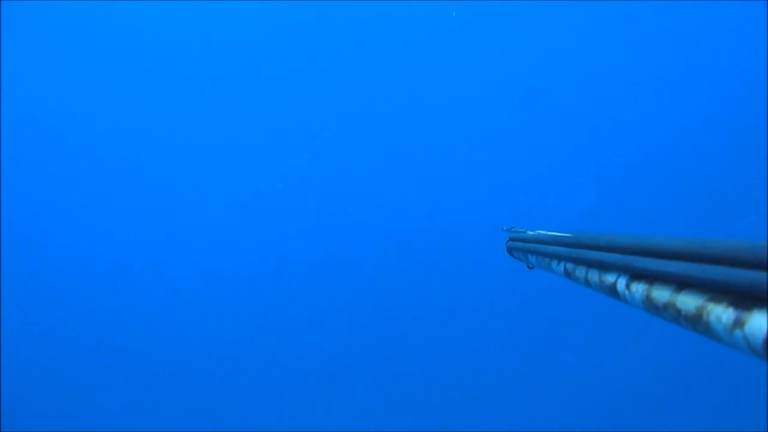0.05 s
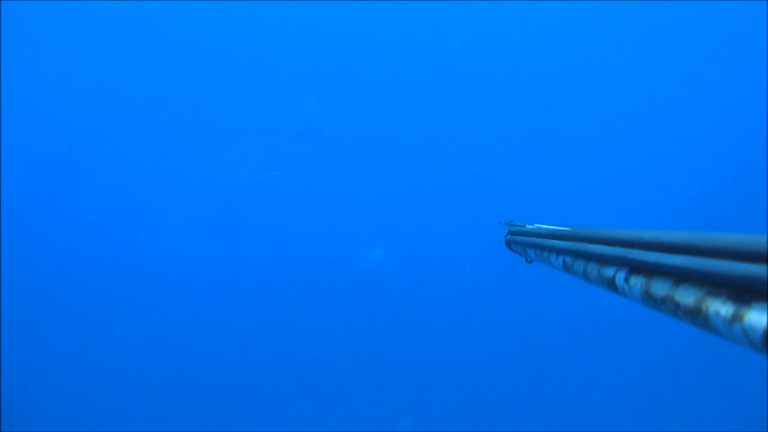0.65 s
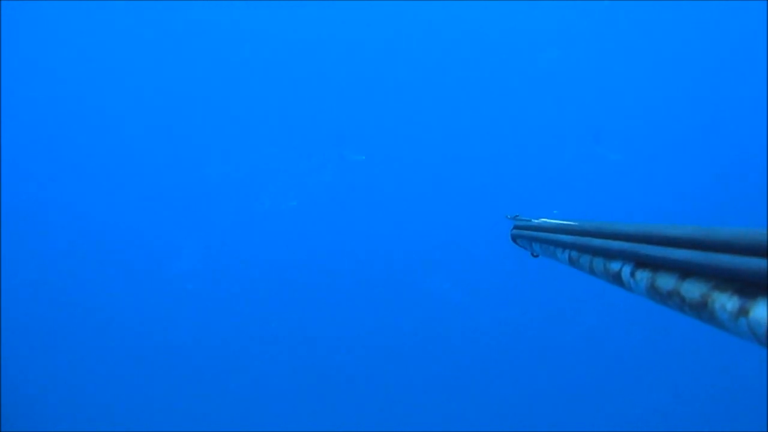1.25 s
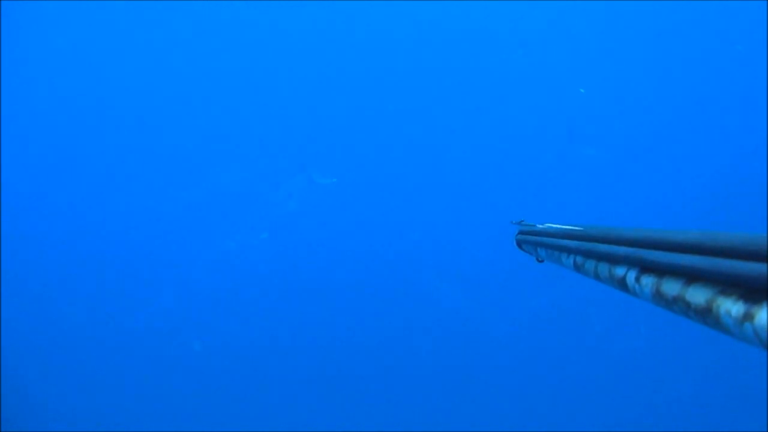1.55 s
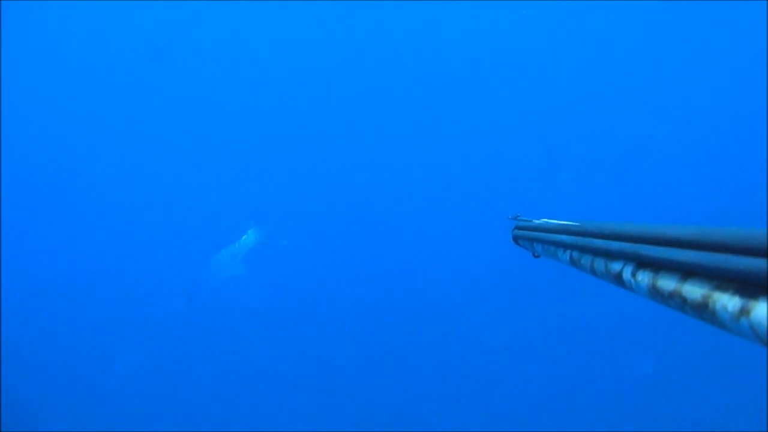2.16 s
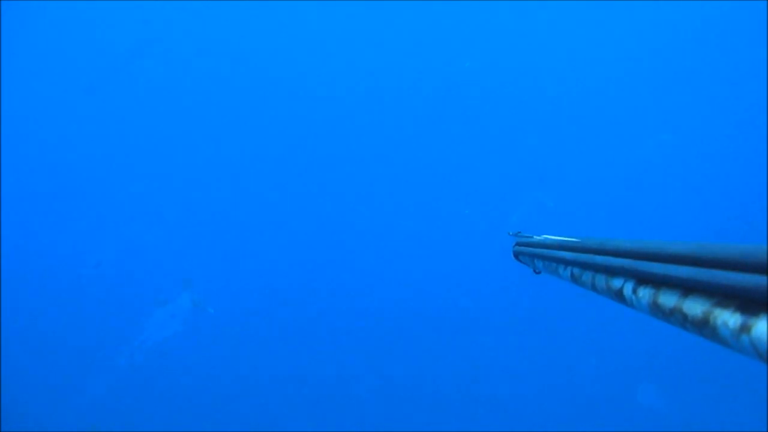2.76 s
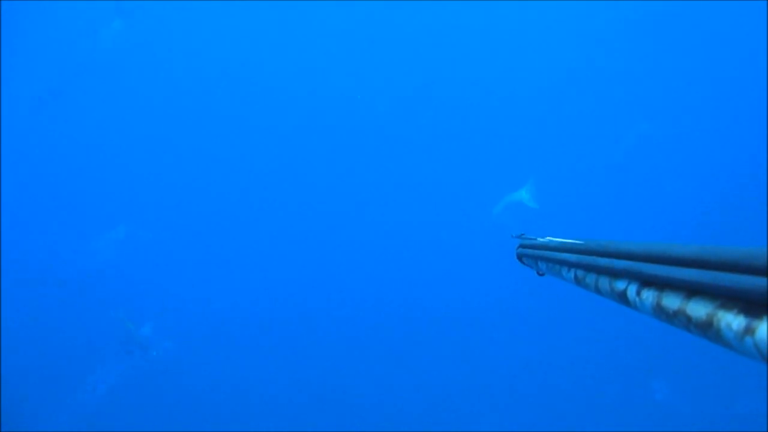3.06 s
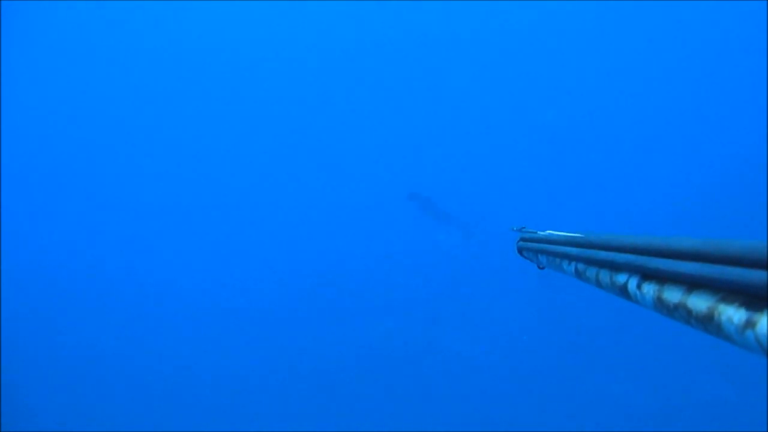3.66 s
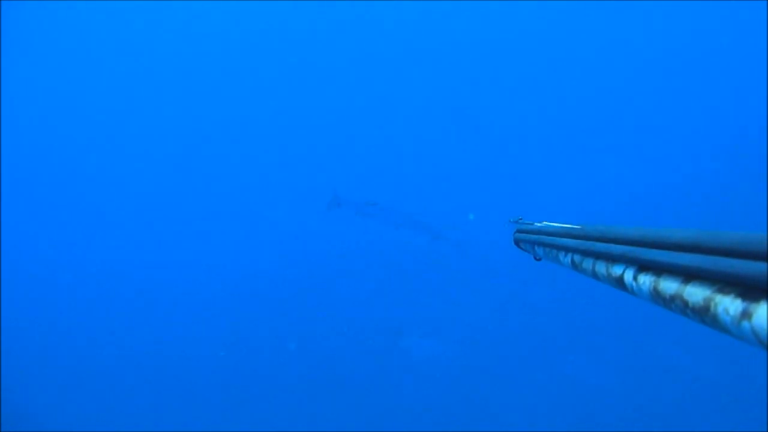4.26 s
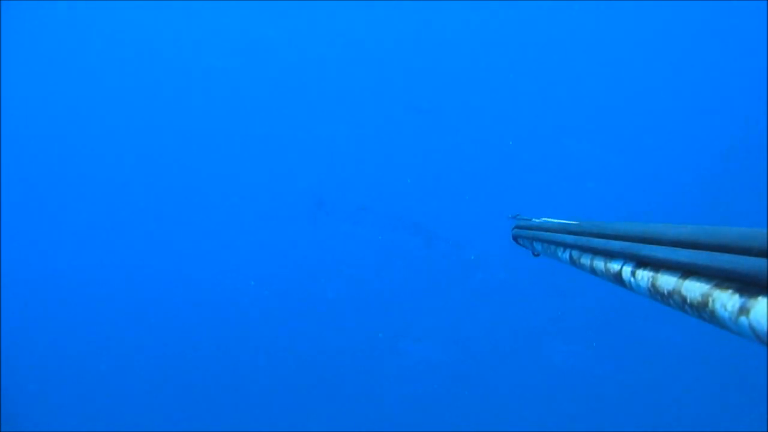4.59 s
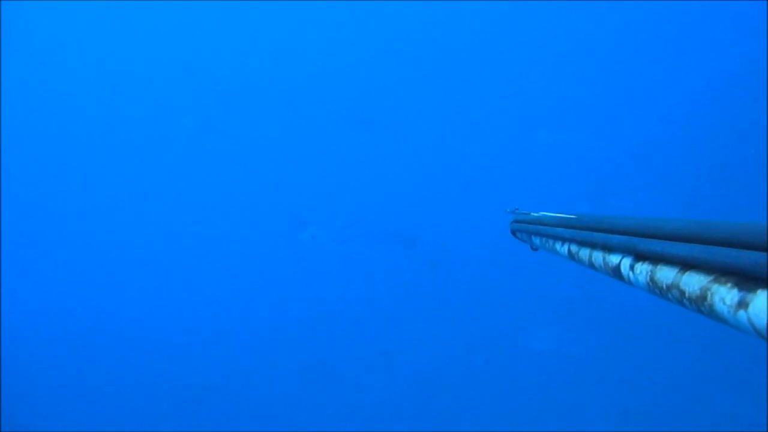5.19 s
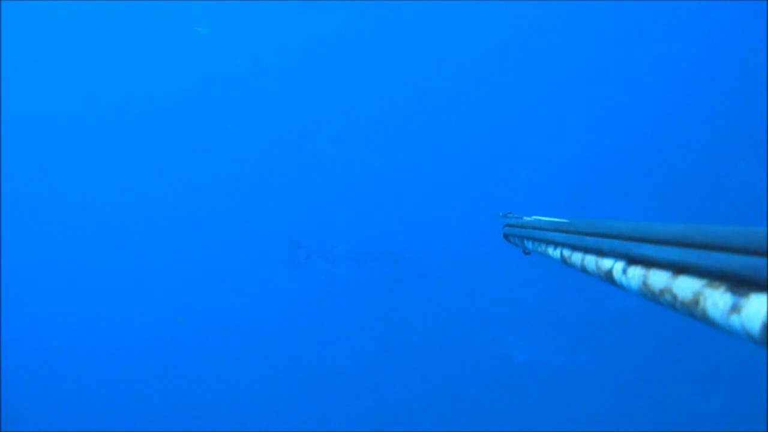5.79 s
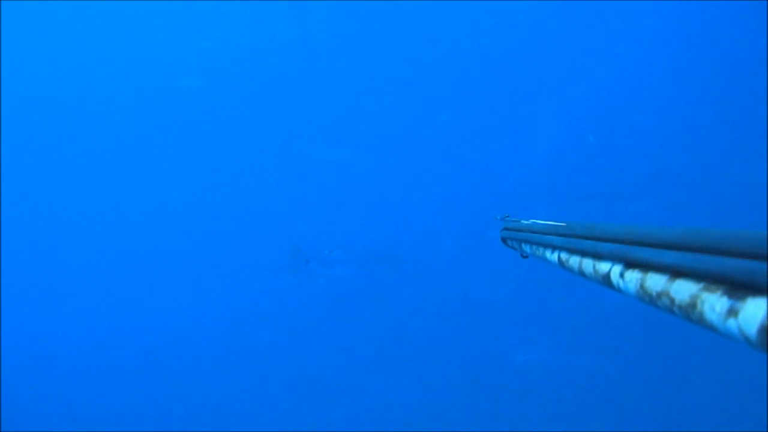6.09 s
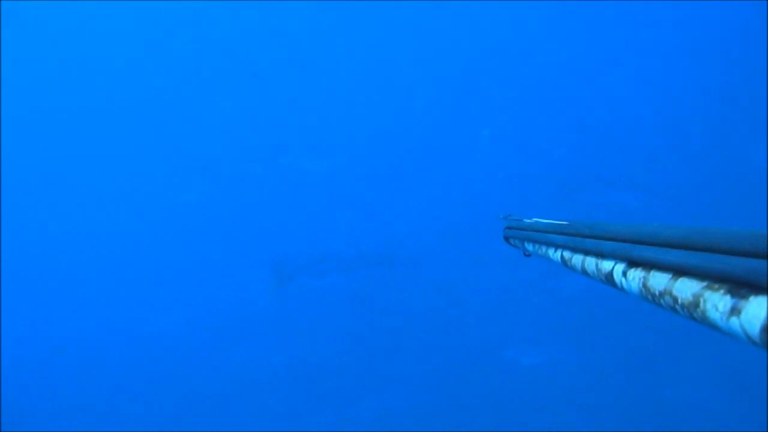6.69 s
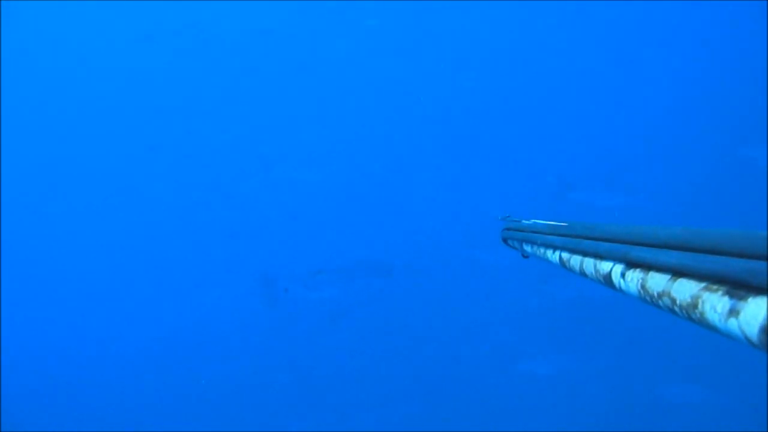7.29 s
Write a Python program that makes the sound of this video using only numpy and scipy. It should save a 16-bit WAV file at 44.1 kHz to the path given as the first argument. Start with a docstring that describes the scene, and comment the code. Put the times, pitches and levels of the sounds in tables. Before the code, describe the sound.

Heard from inside a watertight camera housing in the open sea: an even, soft wash under electrical buzzing and a high whine, with distant shrimp snaps and a few soft, low bumps. A dull knock rings briefly in the case. A sharper click follows a couple of seconds later and starts a fast, raspy motor ticking that continues to the end, briefly joined by faint, high, hissy squeaks.

```python
"""Underwater camera beside a speargun

Open water washes softly, with low gulps, far shrimp snaps and a short run of thin, mostly falling squeaks.
The camera's electronics buzz at the frame rate, whine and hiss. Its watertight housing is knocked twice
and rings; after the second, sharper click a small motor inside ticks once a frame."""
import sys
import numpy as np
from scipy import signal
from scipy.fft import rfft, irfft, next_fast_len
from scipy.io import wavfile
from scipy.ndimage import uniform_filter1d, map_coordinates

SR = 44100
rng = np.random.default_rng(int(sys.argv[2]) if len(sys.argv) > 2 else 0)


def wrap_up_sound(samples):
    """Save the sound to the file named by the first command line argument, as 16-bit audio."""
    columns = np.atleast_2d(samples).T
    # keep every value between -1 and 1, then stretch to whole-number steps
    tamed = np.clip(columns, -1, 1)
    steps = np.round(tamed * 32767).astype(np.int16)
    wavfile.write(sys.argv[1], SR, steps)


N = 332514

FRAME_HZ, BAND_LIMIT_HZ = 59.94, 11040
MOTOR_START_S = 3.985
# loads switched in every frame: t/s into the frame, relative supply current step
LOAD_STEPS = [(.00331, .054), (.00857, -.105), (.00892, .01), (.01057, -.013), (.0145, .014)]


def amp(db):
    """Decibels to gain."""
    return 10 ** (np.asarray(db) / 20)


def unit(x):
    """Scale to rms 1."""
    return x / np.sqrt(np.mean(x ** 2) + 1e-20)


def clock():
    """Sample times in s."""
    return np.arange(N) / SR


def wobble(rate_hz):
    """Smooth random curve, knots at rate_hz."""
    knots = rng.standard_normal(int(N * rate_hz / SR) + 4)
    return map_coordinates(knots, [np.arange(N) * rate_hz / SR])


def filtered(x, response):
    """Apply a frequency response."""
    size = next_fast_len(len(x) + 8192)
    return irfft(rfft(x, size) * response(np.fft.rfftfreq(size, 1 / SR)), size)[:len(x)]


def noise(spectrum):
    """Noise from rows of f/Hz, density/dB."""
    f, db = np.transpose(spectrum)
    white = rng.standard_normal(N) * np.sqrt(SR / 2)
    return filtered(white, lambda hz: amp(np.interp(np.log(hz + 1), np.log(f), db)))


def resonance(hz, centre_hz, width_hz):
    """Response of one damped resonance."""
    return 1j * hz * width_hz / (centre_hz ** 2 - hz ** 2 + 1j * hz * width_hz)


def band(centre_hz, width_hz):
    """Narrow noise band, rms 1."""
    return unit(filtered(rng.standard_normal(N), lambda hz: resonance(hz, centre_hz, width_hz) ** 2))


def fade(t, t60_s):
    """Exponential decay."""
    return np.exp(-np.log(1000) * t / t60_s)


def add(track, start_s, sound):
    """Mix a sound into the track."""
    part = track[max(round(start_s * SR), 0):][:len(sound)]
    part += sound[:len(part)]


def water():
    """Even wash of open water, heard through the housing."""
    # wash spectrum: f/Hz, density/dB
    spectrum = [(28, -106), (120, -91), (190, -90.5), (300, -83.5), (430, -81.5), (600, -81), (1000, -85),
                (2000, -88.5), (2850, -92.5), (3350, -90.5), (4900, -97), (6700, -95.5), (8000, -99),
                (9500, -97), (11000, -96)]
    return noise(spectrum) * amp(0.61 * wobble(2.29) + 0.64 * wobble(10))


def gulps(rise_s=0.0018, bass_cut_hz=130):
    """Each soft bump rings one low, damped note; the housing passes little deep bass."""
    # bumps: t/s, relative level/dB, f/Hz, t60/s
    bumps = [(0.457, -38, 170, 0.038), (1.763, -37, 230, 0.031), (3.9302, -30.5, 254, .035),
             (3.984, -32.5, 241, 0.21), (4.674, -32.5, 288, 0.023), (5.847, -34.5, 310, 0.075),
             (5.851, -34, 465, 0.11), (6.10, -45, 220, 0.067), (7.463, -39, 230, 0.025),
             (7.528, -36, 221, 0.028)]
    out, t = np.zeros(N), np.arange(SR // 3) / SR
    for start_s, db, hz, t60_s in bumps:
        envelope = fade(t, t60_s) * (1 - np.exp(-t / rise_s))
        add(out, start_s, 1.4 * amp(db) * envelope * np.sin(2 * np.pi * hz * t))
    return signal.sosfilt(signal.butter(2, bass_cut_hz, "high", fs=SR, output="sos"), out)


def shrimp(far_count=60, far_db=-52, t60_s=0.019, width_ratio=0.41):
    """Tiny snaps, a few nearer ones among many far ones."""
    # nearest snaps: t/s, level/dB, f/Hz
    near = [(.4925, -38, 9800), (1.2802, -36, 9500), (1.675, -44, 6800), (2.2265, -41, 3100),
            (2.23, -44, 7000), (2.788, -43, 10000), (3.305, -44, 6800), (3.472, -41, 8000),
            (4.806, -44, 4500), (6.946, -43, 4300)]
    far = [(when * N / SR, far_db + 7 * nearness ** 2, 5000 + 5000 * pitch)
           for when, nearness, pitch in rng.random((far_count, 3))]
    out, t = np.zeros(N), np.arange(SR // 40) / SR
    for start_s, db, centre_hz in near + far:
        white = rng.standard_normal(len(t))
        burst = unit(filtered(white, lambda hz: resonance(hz, centre_hz, width_ratio * centre_hz)))
        add(out, start_s, amp(db) * burst * fade(t, t60_s))
    return out


def squeaks(attack_s=0.0062, release_share=.45, linger=.8, swell_db=6):
    """Thin, hissy squeaks: each slides, lingers at its middle pitch and slides on as it dies."""
    # squeaks: t/s, length/s, middle f/Hz, fall per half/ratio, level/dB, pitch waver/ratio
    glides = [(5.564, 0.11, 7000, .01, -50, .04), (5.64, .09, 8850, .03, -58, .022),
              (5.65, .09, 6560, .035, -50, .008), (5.71, .055, 7680, .01, -49.5, .009),
              (5.762, .195, 6420, .13, -45.5, .007), (5.95, .055, 6300, -.08, -56, .022),
              (6.003, .055, 6650, .045, -55.5, .025), (6.08, .04, 4850, .005, -59, .014),
              (6.112, .019, 4340, .003, -48.5, .008)]
    out, t = np.zeros(N), clock()
    hiss = amp(-9) * band(6650, 1800) + amp(-13) * band(10600, 900)
    for start_s, length_s, middle_hz, fall, db, waver in glides:
        progress = np.clip((t - start_s) / length_s, 0, 1)
        side = 2 * progress - 1
        hz = middle_hz * (1 - fall * side * (1 - linger * (1 - side ** 2)))
        phase = 2 * np.pi * np.cumsum(hz * (1 + waver * wobble(700))) / SR
        tone = amp(3 * wobble(160)) * np.sin(phase)
        attack = np.clip((t - start_s) / attack_s, 0, 1)
        release = np.minimum((1 - progress) / release_share, 1)
        out += attack * release * amp(db + swell_db * (progress - .5)) * (tone + hiss)
    return out


def sizzle(centre_hz=9400, width_hz=600, base_db=-67, drop_db=3):
    """Narrow electronic hiss: flickers, surges once, drops when the motor starts."""
    # louder spell: start/s, end/s, boost/dB
    surge = (2.2, 3.2, 2.2)
    start_s, end_s, surge_db = surge
    t = clock()
    db = base_db + surge_db * ((t > start_s) & (t < end_s)) - drop_db * (t > MOTOR_START_S)
    return band(centre_hz, width_hz) * amp(uniform_filter1d(db, size=4096) + 2.7 * wobble(18))


def whine(half_line_hz=7867, db=-50.0, late_db=-4, rest_db=-14):
    """The line clock whistles during picture readout and restarts every second frame."""
    rest_s, start_s, late_s = LOAD_STEPS[0][0], LOAD_STEPS[1][0], LOAD_STEPS[-1][0]
    t = clock() - start_s
    within_s = t % (1 / FRAME_HZ)
    stages = [within_s < late_s - start_s, within_s < 1 / FRAME_HZ + rest_s - start_s]
    gate = uniform_filter1d(amp(np.select(stages, [0, late_db], rest_db)), size=20)
    tone = np.sin(2 * np.pi * half_line_hz * (t % (2 / FRAME_HZ)))
    return amp(db + .4 * wobble(20)) * gate * tone


def buzz(low_hz=170, low_width_hz=314, couple_hz=807, smooth_hz=1412, growth_db_per_s=0.16):
    """Switching loads step the supply; the microphone circuit passes only the edges, as sharp ticks."""
    t, size = clock(), 2048
    hz = np.arange(1, int(BAND_LIMIT_HZ / FRAME_HZ)) * FRAME_HZ
    edges = sum(step * np.exp(-2j * np.pi * hz * at_s) for at_s, step in LOAD_STEPS)
    supply = edges * FRAME_HZ / (2j * np.pi * hz)
    bass_cut = resonance(hz, low_hz, low_width_hz) * 1j * hz / low_width_hz
    coupling = 1j * hz / (couple_hz + 1j * hz) / (1 + 1j * hz / smooth_hz)
    one_frame = irfft(np.r_[0, supply * bass_cut * coupling], size) * size
    ticks = np.interp(t * FRAME_HZ, np.arange(size) / size, one_frame, period=1)
    return ticks * amp(growth_db_per_s * (t - t.mean()) + 0.26 * wobble(25))


def motor(nudge_s=.0053, rise_s=0.00037, t60_s=0.0066, jolt_db=12, settle_s=0.038, ease_db_per_s=0.8):
    """A small motor nudged once a frame, hardest at first: short rasps over a faint, wavering ring."""
    # rasp spectrum: f/Hz, relative density/dB
    spectrum = [(1500, -102), (3000, -85), (4300, -93), (5500, -81), (6050, -92), (7100, -74.5),
                (7900, -79.5), (9700, -87.5), (10800, -79)]
    # motor resonances: f/Hz, width/Hz, relative level/dB
    modes = [(2850, 66, -63), (4320, 48, -68.5), (5720, 73, -72), (6820, 83, -69), (7230, 67, -69)]
    t = clock()
    frame, since_s = np.divmod(t - nudge_s, 1 / FRAME_HZ)
    running_s = np.maximum(t - MOTOR_START_S, 0)
    scatter_db = 2.5 * rng.standard_normal(int(frame.max()) + 2)[frame.astype(int)]
    strength = amp(jolt_db * np.exp(-running_s / settle_s) + scatter_db)
    rasp = 1.7 * noise(spectrum) * strength * fade(since_s, t60_s) * (1 - np.exp(-since_s / rise_s))
    ring = sum(amp(db + 3 * wobble(7)) * band(hz, width_hz) for hz, width_hz, db in modes)
    return (rasp + ring * amp(0.5 - ease_db_per_s * running_s)) * (t > MOTOR_START_S)


def knocks(rise_s=0.00079, crack_t60_s=0.012):
    """A contact cracks; adjacent modes start in antiphase, so the housing swells into a hollow ring."""
    # contacts: t/s, ring level/dB, crack level/dB, softness cut-off/Hz
    contacts = [(1.7576, -24, -66, 1750), (3.9738, -58, -41, 4000), (3.976, -21.5, -20.5, 9000)]
    # housing modes: f/Hz, relative level/dB, t60/s
    modes = [(427, -10.5, 0.031), (783, -9.5, 0.052), (964, -3, 0.025), (1215, -2, 0.031),
             (1410, 1.5, 0.034), (1750, -3.5, .02), (2094, -1.5, 0.021), (2590, -9, .018),
             (2830, -7, 0.027), (3290, -19, 0.02), (4300, -14, 0.019)]
    # contact spectrum: f/Hz, relative level/dB
    spectrum = [(300, -14), (1200, -9), (2400, 0.5), (4200, -1), (5000, -10), (6000, -10), (7000, 2),
                (8300, -6), (9800, 0.5), (11000, -13)]
    out, t = np.zeros(N), np.arange(SR // 5) / SR
    swell = 1 - np.exp(-t / rise_s)
    for start_s, ring_db, crack_db, cutoff_hz in contacts:
        ring = np.zeros(len(t))
        for k, (hz, db, t60_s) in enumerate(modes):
            gain = amp(db + rng.normal(0, 1)) / np.sqrt(1 + (hz / cutoff_hz) ** 6)
            ring += (-1) ** k * gain * fade(t, t60_s) * np.sin(2 * np.pi * hz * t)
        crack = unit(noise(spectrum))[:len(t)] * fade(t, crack_t60_s)
        add(out, start_s, amp(ring_db) * ring * swell + amp(crack_db) * crack)
    return out


def scene():
    """Camera and surrounding sea, mono."""
    camera = buzz() + whine() + sizzle() + motor() + knocks()
    sea = water() + gulps() + shrimp() + squeaks()
    return (camera + sea)[None]


def record(dry):
    """Steep low-pass at the camera's band limit."""
    return filtered(dry[0], lambda hz: 1 / np.sqrt(1 + (hz / BAND_LIMIT_HZ) ** 600))[None]


dry = scene()
out = record(dry)
wrap_up_sound(out)
```